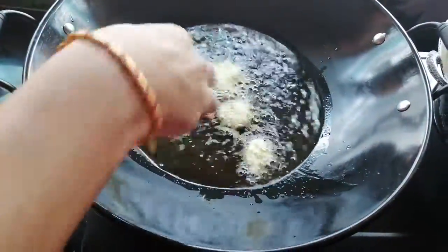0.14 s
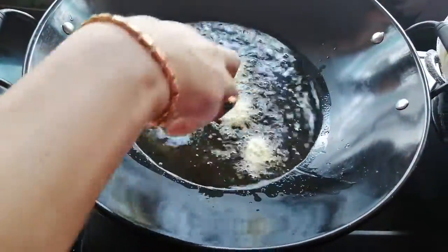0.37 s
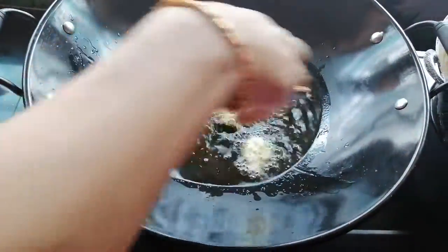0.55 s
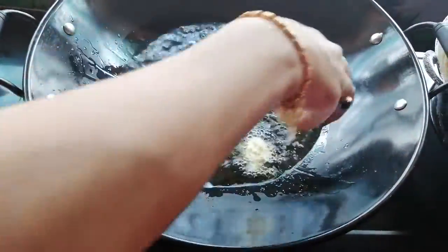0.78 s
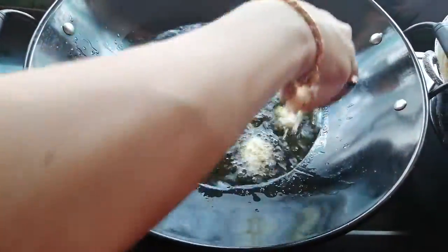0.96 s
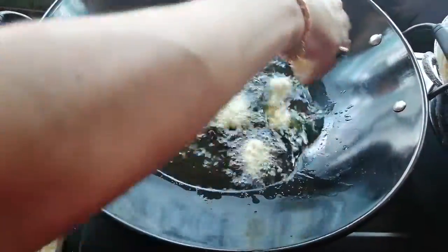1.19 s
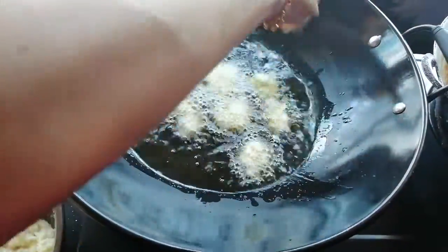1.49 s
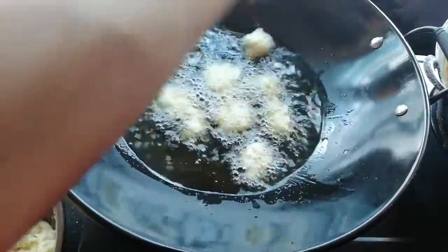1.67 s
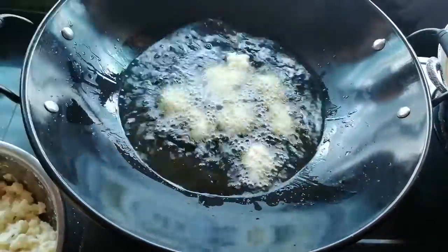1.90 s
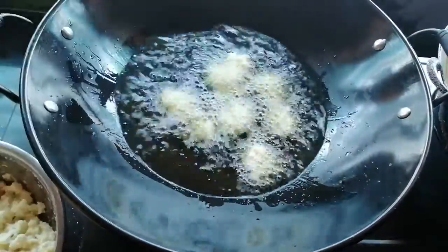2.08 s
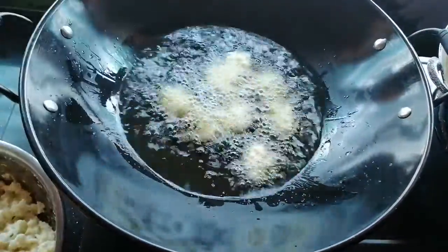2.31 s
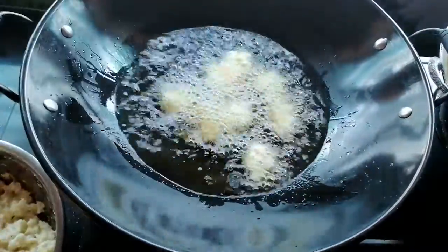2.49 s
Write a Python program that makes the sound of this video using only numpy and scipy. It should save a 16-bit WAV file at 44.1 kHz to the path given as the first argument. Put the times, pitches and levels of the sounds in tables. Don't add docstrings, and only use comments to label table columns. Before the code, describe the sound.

Battered food sizzles continuously in a steel wok of hot oil, a bright, fluttering fizz close to a phone. Sharp snaps and spits scatter throughout. Pitched pops ring the metal near 0.36 s, loudest at 0.58 s, then around 1.05, 1.4 and 1.66 s. From about 1.7 s the frying grows denser, with pings and soft gurgles near 2.2 s. Low burner hum and short kitchen echoes remain underneath.

```python
import sys
import numpy as np
from scipy import signal
from scipy.fft import rfft, irfft, next_fast_len
from scipy.io import wavfile

SR = 44100
rng = np.random.default_rng(int(sys.argv[2]) if len(sys.argv) > 2 else 0)


def master(y):
    cut = np.clip(np.atleast_2d(y).T, -1, 1)
    pcm = np.round(cut * 32767)
    wavfile.write(sys.argv[1], SR, pcm.astype(np.int16))


def boost_factor(decibels):
    exponent = np.asarray(decibels, float) / 20
    return 10 ** exponent


N = 116865

LEFT_RIGHT = np.array([[1], [-1]])
WOK_T60, WALL_T60 = 0.071, 0.42
DROPLET_ECHO = -9.5, -25, 0.016, 0.15


def evened(x):
    return x / np.sqrt(np.mean(x ** 2) + 1e-20)


def read(points, hz):
    f, value = np.transpose(points)
    return np.interp(np.log(hz + 1), np.log(f + 1), value)


def humps(table, hz):
    return boost_factor(sum(db * np.exp(-((hz - f) / width) ** 2) for f, width, db in table))


def coloured(x, gain):
    size = next_fast_len(N)
    hz = np.fft.rfftfreq(size, 1 / SR)
    return irfft(rfft(x, size) * gain(hz), size)[..., :N]


def add(mix, start_s, sound):
    part = mix[:, round(start_s * SR):][:, :sound.shape[1]]
    part += sound[:, :part.shape[1]]


def bubble(hz, cycles, glide):
    u = np.arange(0, 2 * cycles + 1, hz / SR) / cycles
    phase = 2 * np.pi * cycles * (u + glide * (u ** 2 - u))
    shape = u ** 2 * np.exp(-5 * u) * np.sin(phase)
    return shape / abs(shape).max()


def echoes(wok_db, wall_db, wok_t60, wall_t60):
    slot, slots = 20, round(0.45 * SR) // 20
    taps = np.zeros((2, slots * slot))
    places = np.arange(slots) * slot + rng.integers(0, slot, (2, slots))
    np.put_along_axis(taps, places, rng.standard_normal((2, slots)), 1)
    t = np.arange(slots * slot) / SR
    held = np.maximum(t - 0.098 * wok_t60, 0)
    taps *= boost_factor(wok_db - 60 * held / wok_t60) + boost_factor(wall_db - 60 * t / wall_t60)
    taps[:, :30] = 0
    taps[:, 0] = 1
    return taps


def bursts(rows, glide, trim_db, wok_db, wall_db, wok_t60, wall_t60):
    out = np.zeros((2, N))
    for start_s, level_db, pitch_hz, pan_db, cycles in rows:
        dry_bubble = bubble(pitch_hz, max(cycles, 0.5), glide)
        paths = echoes(wok_db, wall_db, wok_t60, wall_t60)
        sound = signal.fftconvolve(dry_bubble[None], paths, axes=1)
        gain = boost_factor(level_db + trim_db + LEFT_RIGHT * pan_db / 2)
        add(out, start_s, gain * sound / abs(sound).max())
    return out


def swarm(pitches, per_s, spread_db, cycles, wet_db, t60):
    spreads = np.minimum(rng.exponential(1, N), 2.6)
    size = boost_factor(spread_db * spreads) * (rng.random(N) < per_s / SR)
    kind = rng.integers(0, len(pitches), N)
    out = np.zeros((2, N))
    for k, hz in enumerate(pitches):
        grain = bubble(hz, cycles * rng.uniform(0.4, 2.0), rng.uniform(0, 0.13))
        train = signal.oaconvolve(size * (kind == k), grain / np.linalg.norm(grain))[:N]
        later = np.roll(train, rng.integers(-8, 9))
        out += [train, later] * boost_factor(rng.normal(0, 1.24) * LEFT_RIGHT)
    tail = echoes(wet_db, wet_db - 23.5, t60, WALL_T60)
    return evened(signal.fftconvolve(out, tail, axes=1)[:, :N])


# pitch_hz [Hz], density_db [dB per Hz]
HUM_SPECTRUM = [(12, -19), (20, -9), (160, -9), (359, -9), (561, -3), (1010, -5.5), (1390, 1), (1740, -3),
                (2500, 3.5), (3250, -32), (5500, -120)]
# pitch_hz [Hz], width_hz [Hz], level_db [dB]
ROOM_MODES = [(34.6, 8.3, 7.5), (98.6, 6.3, 9.5), (161, 29, 7), (230, 20, -2), (283, 22, 5),
              (342.3, 3.8, 7.5), (610, 25, 3.5)]
# pitch_hz [Hz], likeness [0 to 1]
COHERENCE = [(60, 0.79), (180, 0.89), (550, 0.84), (1650, 0.026), (4970, 0.01), (15000, 0.02)]


def hum():
    a, b = rng.standard_normal((2, N))
    same = lambda hz: np.clip(read(COHERENCE, hz), 0, 1)
    right = coloured(a, same) + coloured(b, lambda hz: np.sqrt(1 - same(hz) ** 2))
    shape = lambda hz: boost_factor(read(HUM_SPECTRUM, hz)) * humps(ROOM_MODES, hz) / (1 + (hz / 2200) ** 6)
    return boost_factor(-56 + 1.0) * evened(coloured(np.array([a, right]), shape))


def clumps():
    drift = coloured(rng.standard_normal(N), lambda hz: hz / (hz + 3) / (1 + (hz / 44) ** 2))
    return boost_factor(1.5 * evened(drift))


# pitch_hz [Hz], density_db [dB per Hz]
FIZZ_SPECTRUM = [(880, -11), (1500, -8.5), (2810, -0.5), (3890, -4), (4510, 1.5), (8620, -3), (10900, -9.5),
                 (14800, -12.5), (15700, -34)]


def fine_fizz():
    fine = swarm(np.geomspace(1500, 16500, 40), per_s=9000, spread_db=2, cycles=2.94, wet_db=-16.0, t60=0.03)
    wok_db, _, wok_t60, _ = DROPLET_ECHO
    ticks = swarm(np.geomspace(4500, 14000, 16), 450, 3.5, 1.1, wok_db, wok_t60)
    shape = lambda hz: boost_factor(read(FIZZ_SPECTRUM, np.minimum(hz, 14800))) * np.sqrt(hz / 8000)
    return evened(coloured(fine + boost_factor(-4.5) * ticks, shape)) * clumps()


# start_s [s], fizz_db [dB], large_db [dB], gurgle_db [dB], small_db [dB]
BOIL_COURSE = [(0, -45.5, -6, -32, -3.5), (.28, -45.5, -15, -15, -6), (.35, -47, -6, -20, -11),
               (.5, -44, -6, -1.5, -19), (.9, -45.5, -7, -1, -6.5), (1.2, -45, 2, -21, -12),
               (1.45, -43, -10, -6, -9.5), (1.68, -43.5, 2, -0.5, -8), (1.78, -42.5, -8, -6, 0.5),
               (1.98, -45.5, 7.5, 2.5, 4.5), (2.06, -41.5, -8, -1.5, -10), (2.25, -41, -23, 1, -8.5),
               (2.65, -42.5, 3.5, 0.5, -10)]


def boil():
    start_s, level_db, large_db, gurgle_db, small_db = np.transpose(BOIL_COURSE)
    along = lambda db: boost_factor(np.interp(np.arange(N) / SR, start_s, db))
    large = swarm(4480 * np.linspace(0.93, 1.1, 8), 330, 2.0, 5.4, wet_db=-5, t60=0.1)
    gurgle = swarm(626 * np.geomspace(0.9, 2.2, 10), 500, 2.2, 4.1, wet_db=-25.5, t60=0.18)
    small = swarm(8550 * np.linspace(0.96, 1.04, 6), 1300, 2.8, 9.4, wet_db=-26, t60=0.025)
    spells = along(large_db - 11) * large
    spells += along(gurgle_db - 15) * gurgle
    spells += along(small_db - 2.5) * small
    return along(level_db) * (boost_factor(-0.78) * fine_fizz() + spells)


# start_s [s], level_db [peak dB]
SNAP_EVENTS = [(0.0378, -28), (0.0543, -32), (0.2214, -41), (0.415, -39), (0.5771, -42), (0.856, -44),
               (0.9612, -47), (0.962, -38), (1.0949, -36), (1.1398, -47), (1.1513, -40), (1.1683, -37),
               (1.2411, -39), (1.275, -31), (1.4626, -43), (1.4875, -37), (1.5384, -39), (1.5743, -37),
               (1.6501, -31), (1.6975, -36), (1.7923, -43), (1.8098, -35), (1.8597, -41), (1.9205, -40),
               (1.9565, -27), (2.0373, -35), (2.0722, -39), (2.0936, -27.5), (2.2268, -40), (2.3012, -32),
               (2.3945, -34), (2.4972, -28), (2.5451, -33), (2.597, -34)]


def snaps():
    rows = [(start_s, level_db, 12500, 0, 1.7) for start_s, level_db in SNAP_EVENTS]
    return bursts(rows, 0, 3.1, *DROPLET_ECHO)


# start_s [s], level_db [peak dB], pitch_hz [Hz]
SPIT_EVENTS = [(0.0543, -36, 7560), (0.1705, -30.5, 8600), (0.2463, -31, 6600), (0.3531, -45, 8690),
               (0.3636, -31, 4620), (0.4045, -38, 6900), (0.4234, -32, 7200), (0.4359, -30.5, 7560),
               (0.4923, -48, 7200), (0.5452, -30, 5250), (0.5711, -28, 8080), (0.5776, -26, 7010),
               (0.6345, -38, 8680), (0.6749, -43, 7130), (0.7013, -35, 6800), (0.7547, -37, 8700),
               (0.9293, -33, 5040), (0.9602, -46, 8600), (0.9602, -30, 7200), (1.0221, -32, 5050),
               (1.0455, -31, 6480), (1.0879, -28, 5950), (1.1393, -38, 8160), (1.2186, -40, 5170),
               (1.26, -42, 4570), (1.2665, -42, 4600), (1.3823, -38, 4570), (1.4067, -42, 4550),
               (1.4187, -36, 4880), (1.5499, -43, 4710), (1.6501, -29.5, 8550), (1.7654, -27, 8600),
               (1.7948, -37, 8500), (1.8088, -30, 7800), (1.8482, -31, 8370), (1.9036, -28, 8500),
               (1.9305, -30.5, 8440), (1.9565, -27.5, 8500), (2.0063, -26, 5500), (2.1116, -30, 4610),
               (2.2313, -26, 7000), (2.2802, -29, 8150), (2.3032, -28.5, 6900), (2.3411, -33, 8660),
               (2.3775, -32.5, 6900), (2.4359, -34, 8800), (2.4942, -33, 5100), (2.5451, -30.5, 8000),
               (2.576, -30.5, 8460)]


def spits():
    rows = [(*row, 0, 2.8) for row in SPIT_EVENTS]
    return bursts(rows, 0, 1.8, *DROPLET_ECHO)


# pitch_hz [Hz], level_db [dB], t60_s [s]
STEEL_MODES = [(2210, 6.5, 0.18), (2610, 6, .2), (2740, 3, .25), (2940, 5, .4), (3100, 3, .2),
               (3354, 7, 0.24), (3440, 7, 0.46), (3570, -12, .25), (3730, -1, 0.13), (4360, 12.5, 0.18)]
# pitch_hz [Hz], width_hz [Hz], level_db [dB]
POP_DIPS = [(3100, 68, -5), (1880, 250, -3.5)]


def steel(x):
    t = np.arange(SR // 2) / SR
    modes = np.zeros(len(t))
    for hz, db, t60 in STEEL_MODES:
        unit_gain = 2 * np.log(1000) / (t60 * SR)
        modes += boost_factor(db - 60 * t / t60) * np.sin(2 * np.pi * hz * t) * unit_gain
    ringing = signal.fftconvolve(x, modes[None], axes=1)[:, :N]
    return coloured(x + ringing, lambda hz: humps(POP_DIPS, hz))


# start_s [s], level_db [peak dB], pitch_hz [Hz], left_right_db [dB], cycles [count]
POP_EVENTS = [(.3631, -20.5, 2650, 4, 5.6), (.5776, -13.5, 3410, 5, 5.9), (1.0231, -24, 3600, 1.5, 3.6),
              (1.056, -22, 3100, 0.5, 5), (1.261, -28, 3840, 1, 3.8), (1.4165, -22, 2350, 0.5, 6.7),
              (1.55, -31, 3700, 2, 4.6), (1.6641, -24.5, 3680, 5, 4.9), (1.6102, -36.5, 2150, -9, 3.6),
              (1.6861, -36.5, 2140, -11, 6.1), (2.0068, -30.5, 3550, 2, 3.7), (2.1126, -27, 3800, 5.5, 4.9),
              (2.1869, -32, 2720, 2, 2), (1.9719, -38, 3180, 0, 3)]


def pops():
    return steel(bursts(POP_EVENTS, 0.12, -1.97, -5.5, -8.0, WOK_T60, WALL_T60))


# start_s [s], level_db [peak dB], pitch_hz [Hz]
PING_EVENTS = [(0.3685, -37.5, 4370), (0.5823, -34, 4330), (1.0914, -38, 4360), (1.259, -30, 4510),
               (1.3806, -36, 4480), (1.4196, -31, 4400), (1.5508, -37, 4520), (1.6632, -24.5, 4360),
               (1.7142, -35, 4550), (1.8665, -32, 4440), (1.9114, -38.5, 4620), (2.08, -37.5, 4550),
               (2.1081, -30.5, 4450), (2.156, -36, 4360), (2.1906, -34.5, 4370), (2.2159, -33.5, 4520),
               (2.2805, -37.5, 4400), (2.3291, -47, 4550), (2.432, -44, 4560)]


def pings():
    rows = [(start_s, level_db, pitch_hz, 0, 14.0) for start_s, level_db, pitch_hz in PING_EVENTS]
    return bursts(rows, 0, 2.62, -8.5, -16.0, 0.066, 0.52)


# start_s [s], level_db [peak dB], pitch_hz [Hz], cycles [count]
GURGLE_EVENTS = [(1.107, -49.5, 610, 5.9), (1.484, -44.5, 910, 5.4), (1.6091, -30, 2080, 3),
                 (2.126, -47, 574, 2.7), (2.18, -45.5, 650, 9.6), (2.1985, -33.5, 633, 3.2),
                 (2.225, -48, 610, 18.3), (2.244, -43, 620, 4.1), (2.356, -44.5, 680, 2.2),
                 (2.3915, -33, 1000, 2.2), (0.5691, -45, 1200, 5.2), (1.6487, -39, 1590, 3.4),
                 (2.1276, -46, 1410, 3), (2.1843, -43, 1430, 4), (2.1972, -40, 1360, 5.6),
                 (2.2155, -43, 1160, 3.7), (2.358, -40, 1450, 2.7), (2.4492, -39, 1150, 2.8)]


def gurgles():
    rows = [(start_s, db, hz, 3, cycles) for start_s, db, hz, cycles in GURGLE_EVENTS]
    return bursts(rows, 0.13, 0, -25.0, -27, 0.095, 0.67)


def scene():
    wok = boil() + pops() + pings() + gurgles()
    wok = np.array([np.roll(wok[0], 3), wok[1]])
    side = coloured(wok[0] - wok[1], lambda hz: 0.15 / (1 + (hz / 1100) ** 4))
    return hum() + wok - LEFT_RIGHT * side + snaps() + spits()


def band_limit(x):
    return signal.sosfilt(signal.butter(12, 16540, fs=SR, output="sos"), x)


# pitch_hz [Hz], width_hz [Hz], left_db [dB], right_db [dB]
PORT_MODES = [(2260, 115, 3, 2.5), (3100, 660, 4.5, -2), (4500, 110, -4.5, 1), (7150, 760, -2, 6),
              (8400, 1200, 5.5, -2.5), (14800, 490, -4, 6.5)]
# pitch_hz [Hz], left_right_db [dB]
PORT_BALANCE = [(60, -1.5), (380, 3.5), (2380, -3), (15000, 0.9)]


def record(dry):
    left = [(hz, width, left_db) for hz, width, left_db, _ in PORT_MODES]
    right = [(hz, width, right_db) for hz, width, _, right_db in PORT_MODES]
    ring = lambda hz: np.array([humps(left, hz), humps(right, hz)])
    balance = lambda hz: boost_factor(LEFT_RIGHT * read(PORT_BALANCE, hz) / 2)
    mix = coloured(dry, lambda hz: balance(hz) * ring(hz) * (hz < 15830))
    return band_limit(mix)


dry = scene()
out = record(dry)
master(out)
```